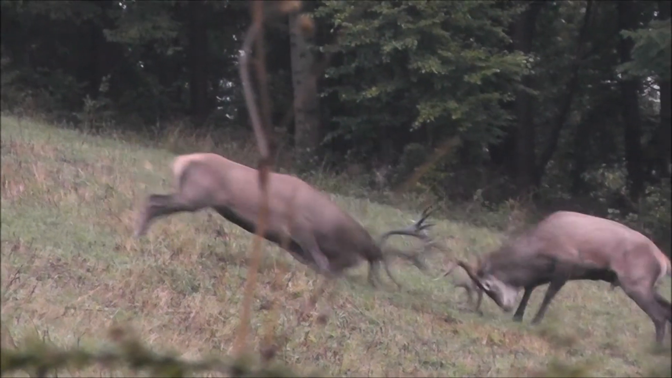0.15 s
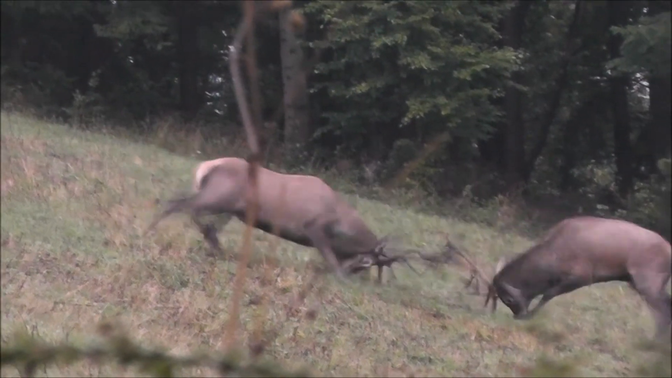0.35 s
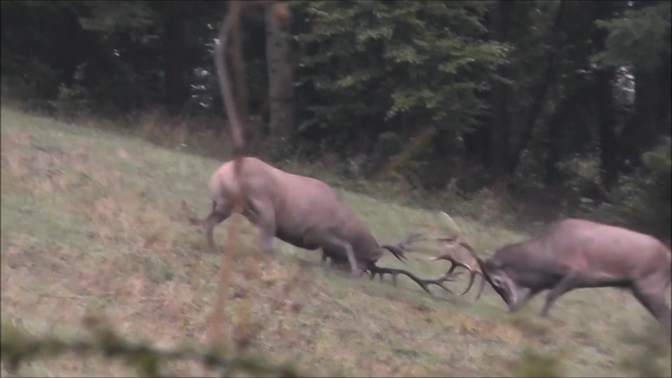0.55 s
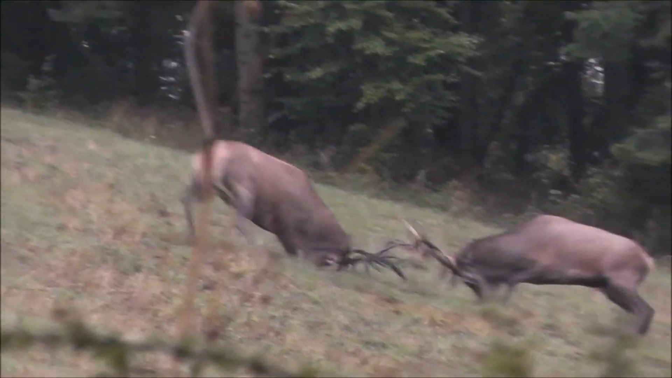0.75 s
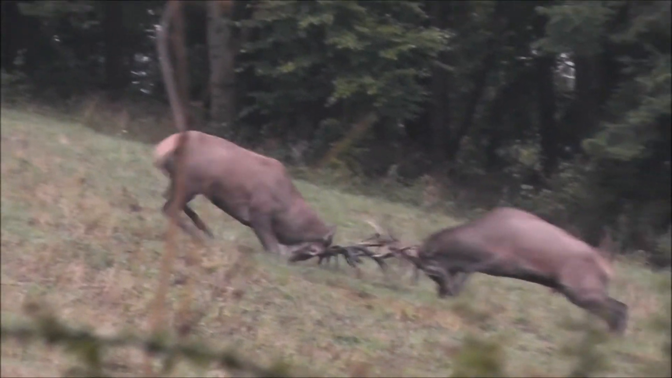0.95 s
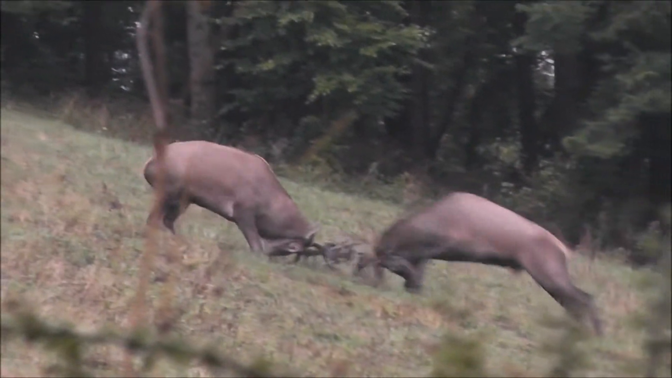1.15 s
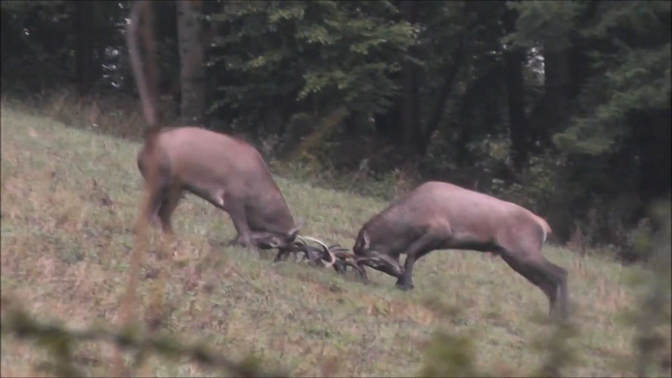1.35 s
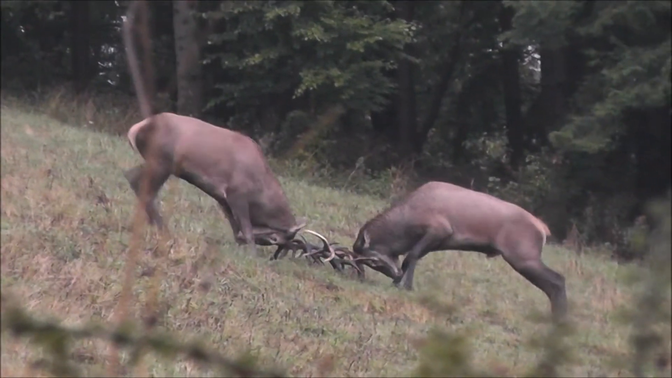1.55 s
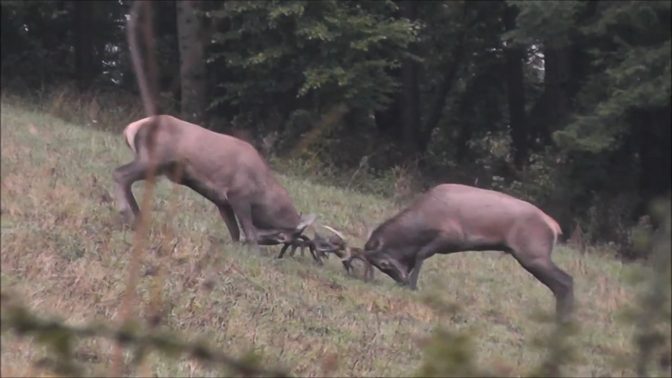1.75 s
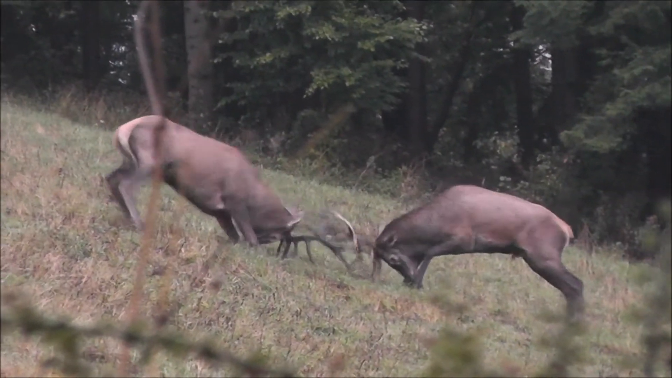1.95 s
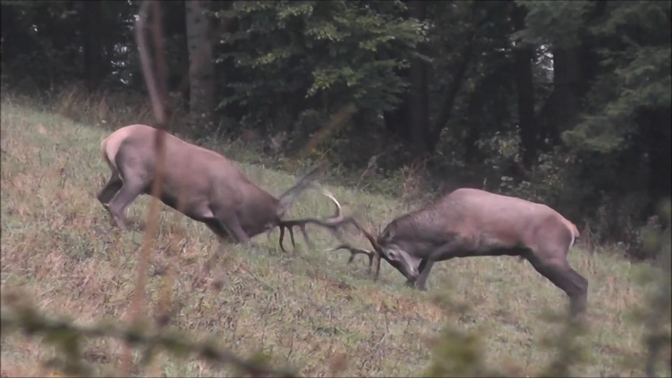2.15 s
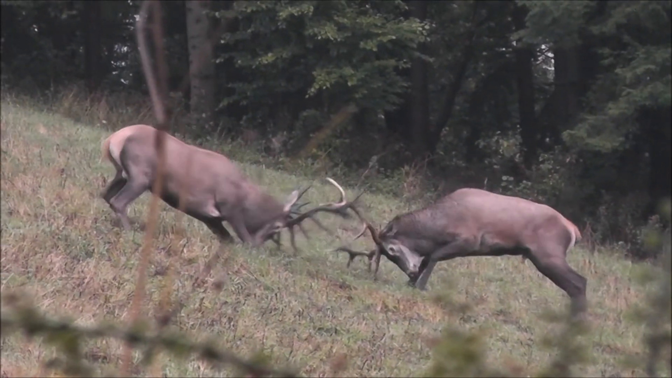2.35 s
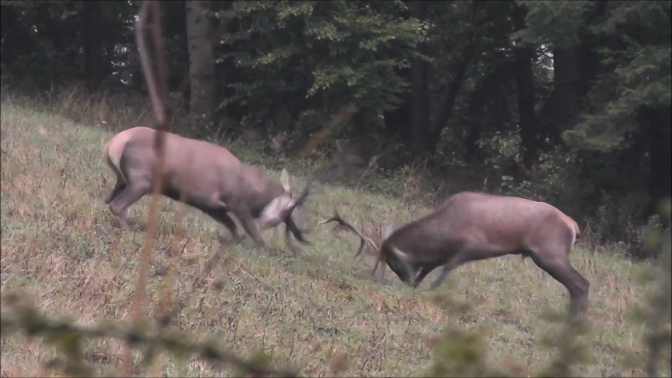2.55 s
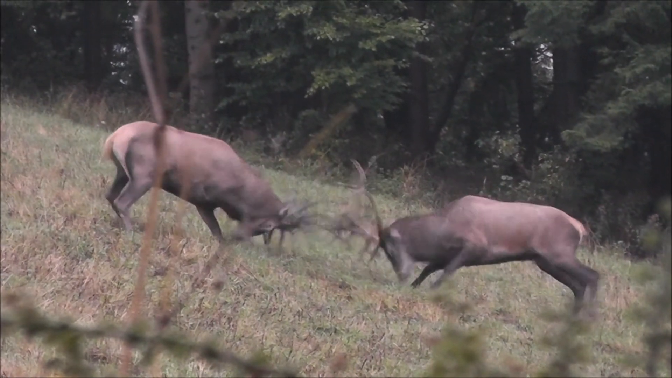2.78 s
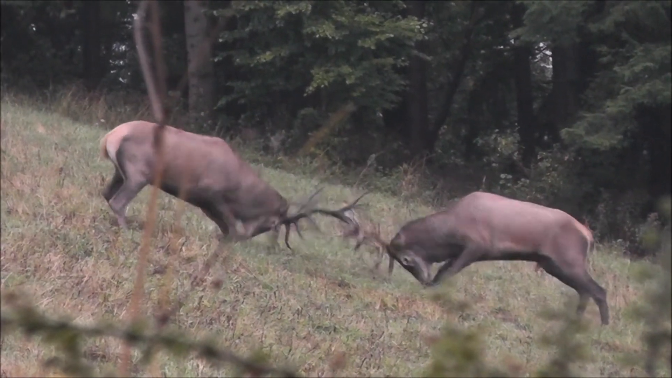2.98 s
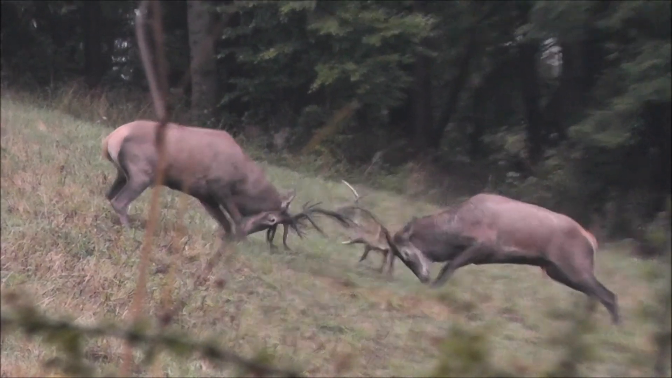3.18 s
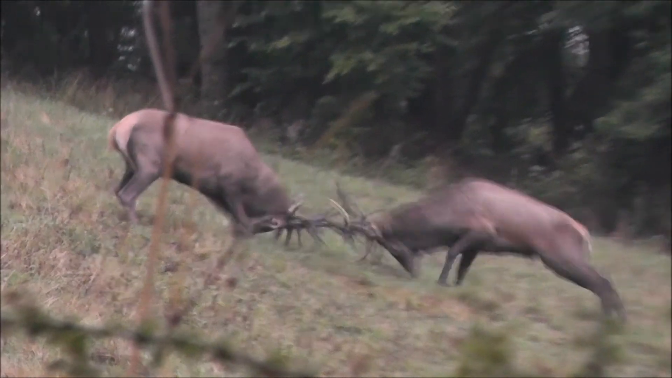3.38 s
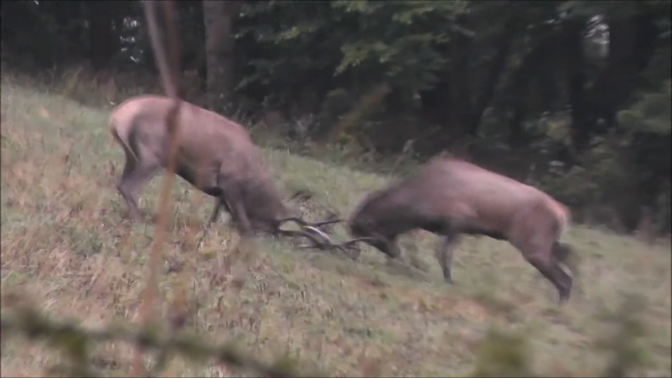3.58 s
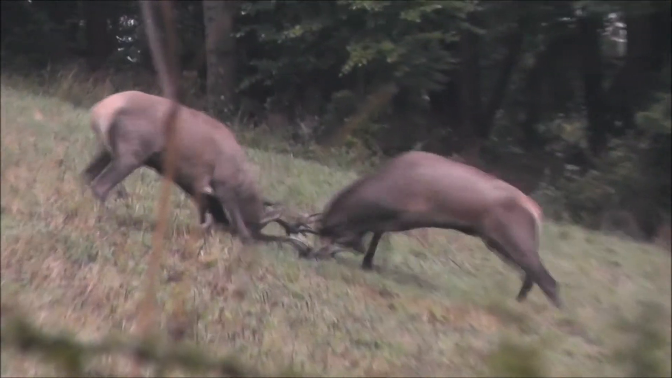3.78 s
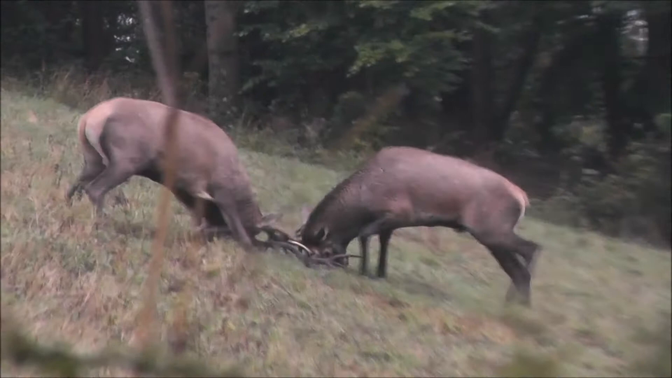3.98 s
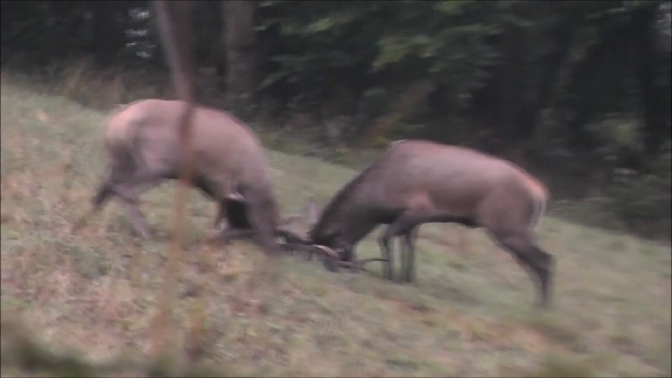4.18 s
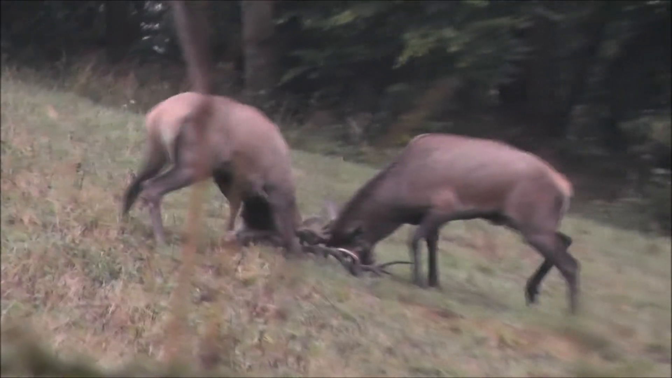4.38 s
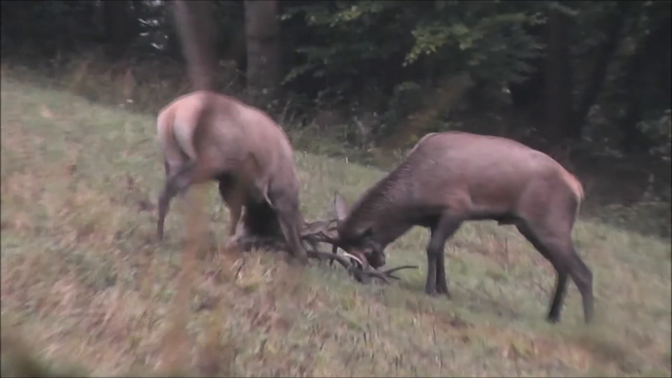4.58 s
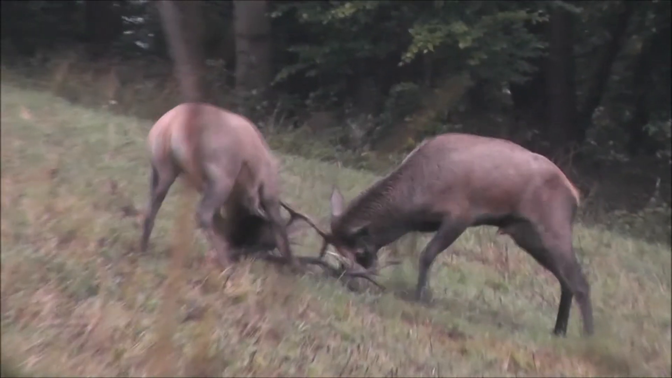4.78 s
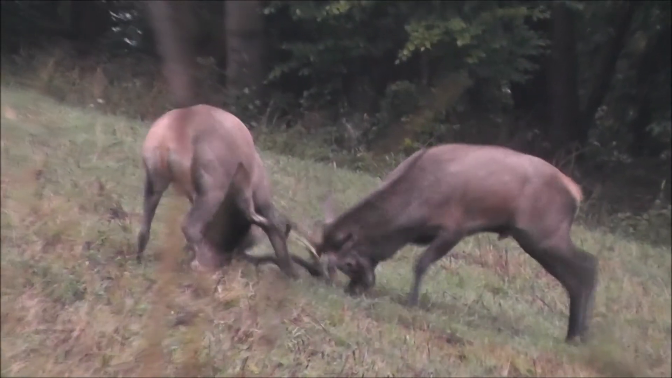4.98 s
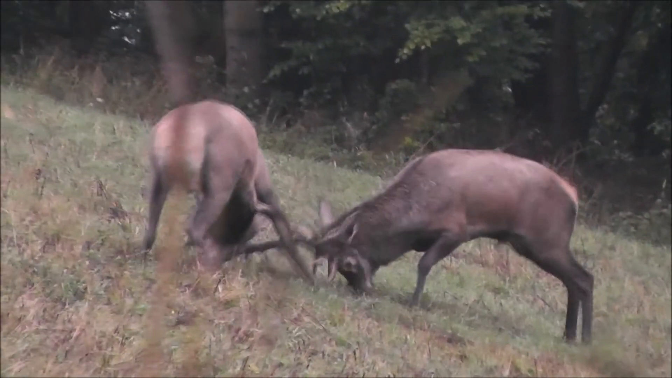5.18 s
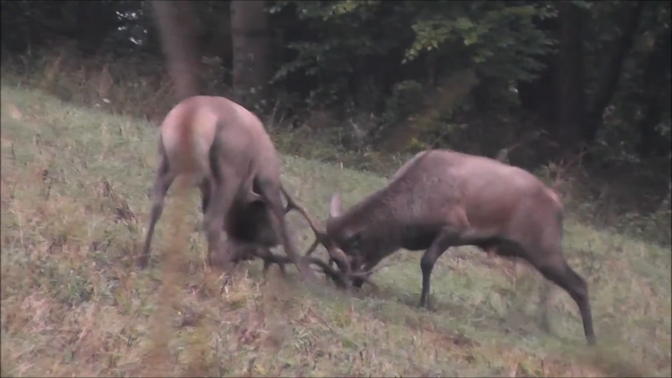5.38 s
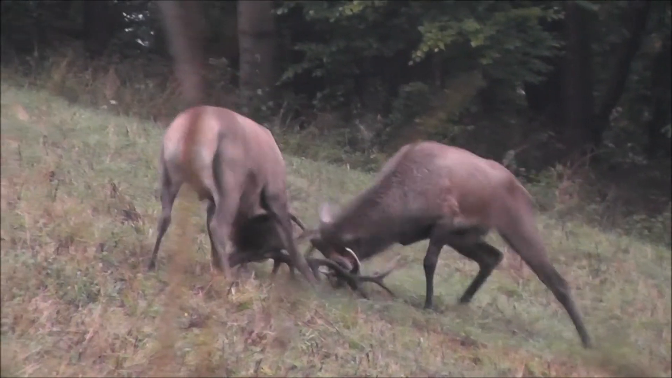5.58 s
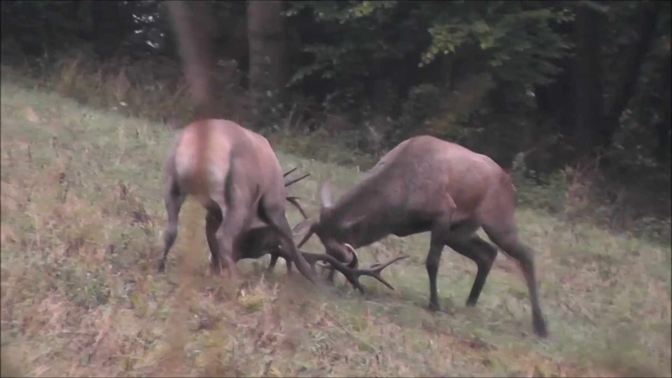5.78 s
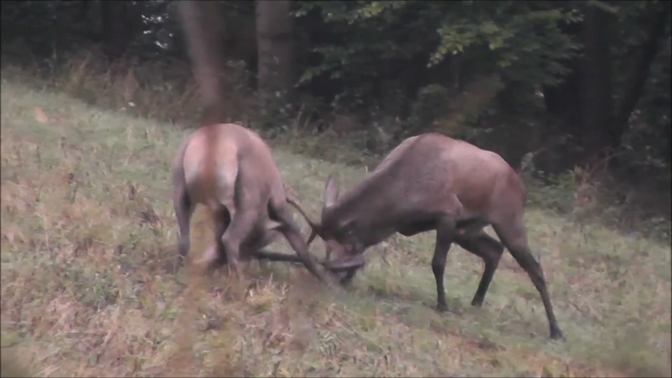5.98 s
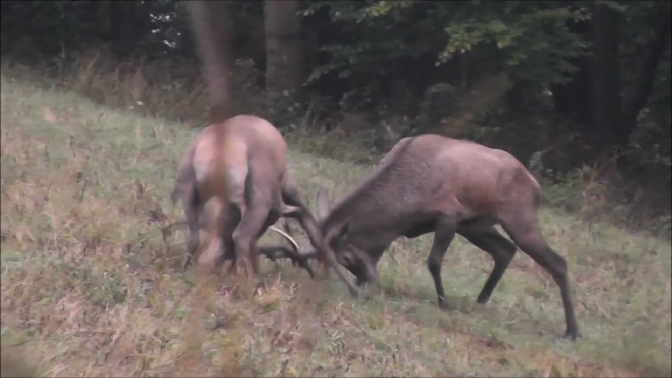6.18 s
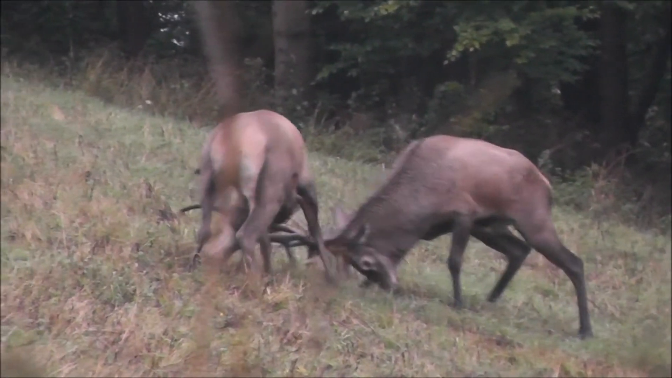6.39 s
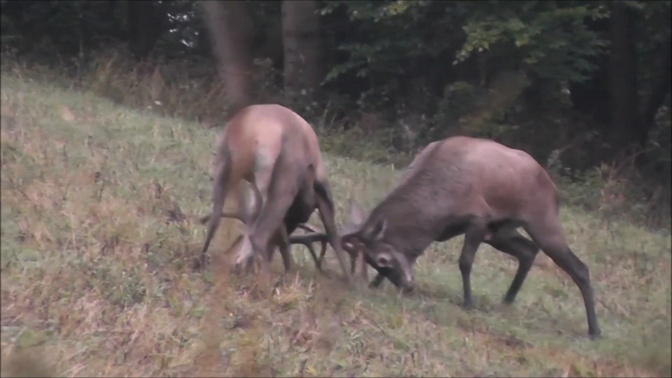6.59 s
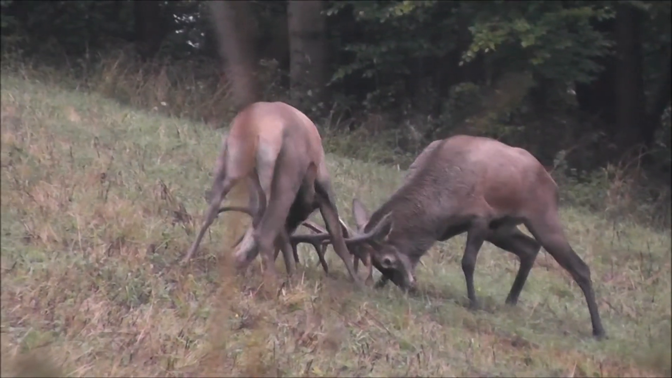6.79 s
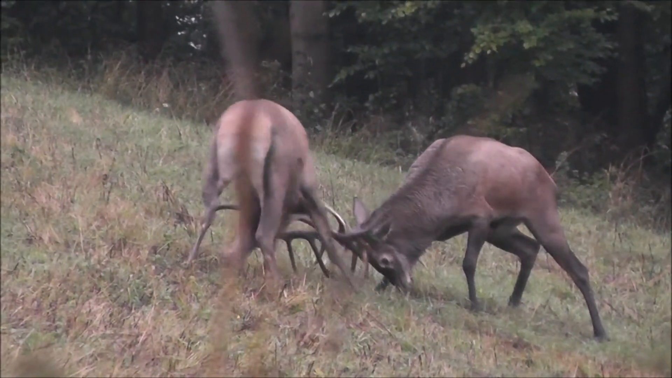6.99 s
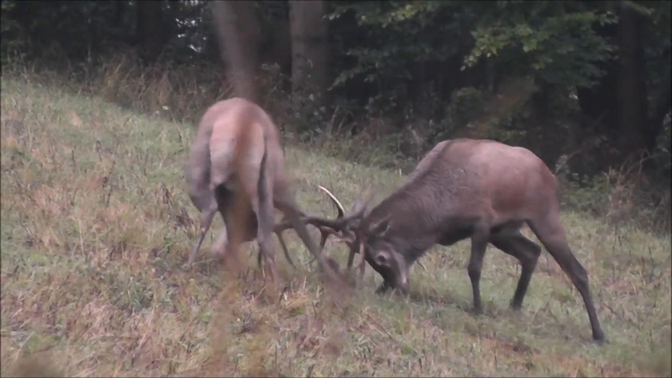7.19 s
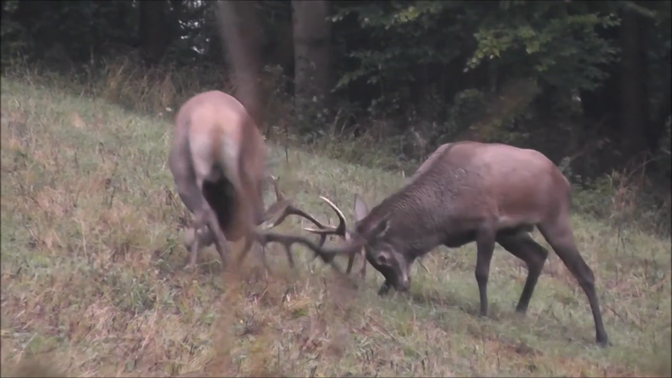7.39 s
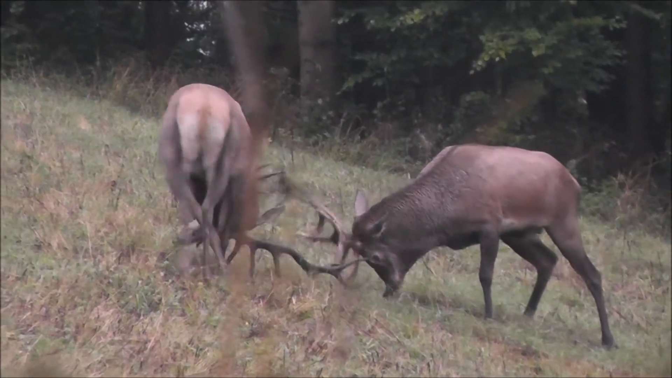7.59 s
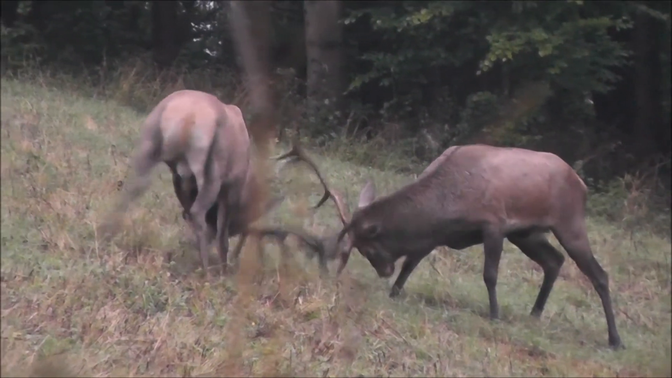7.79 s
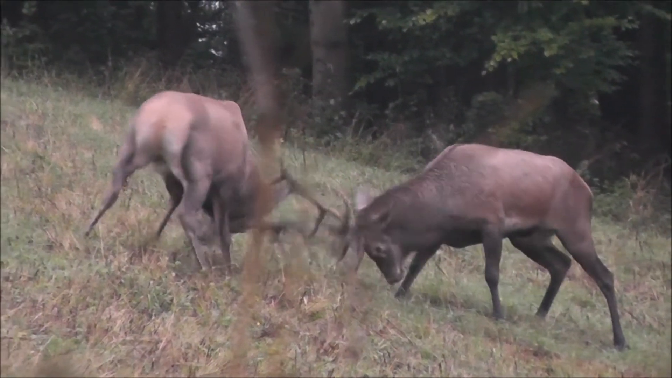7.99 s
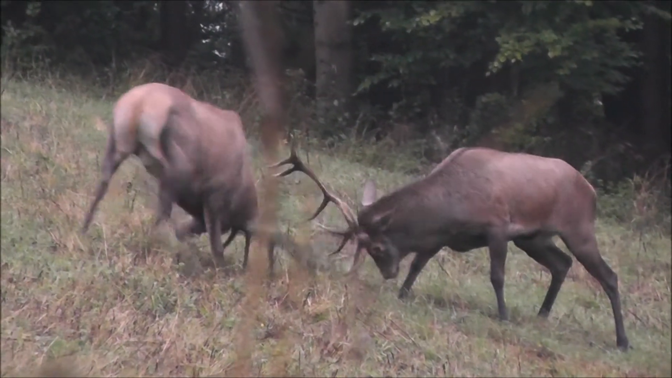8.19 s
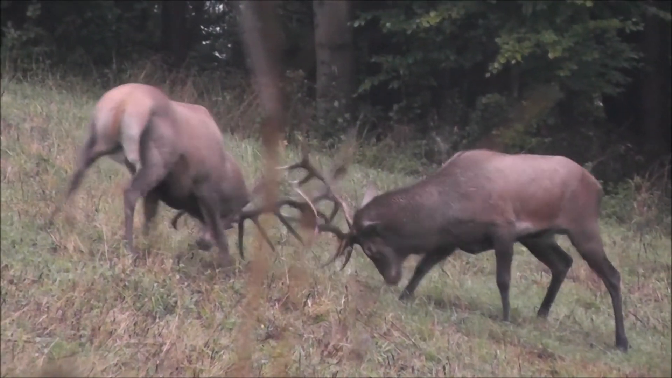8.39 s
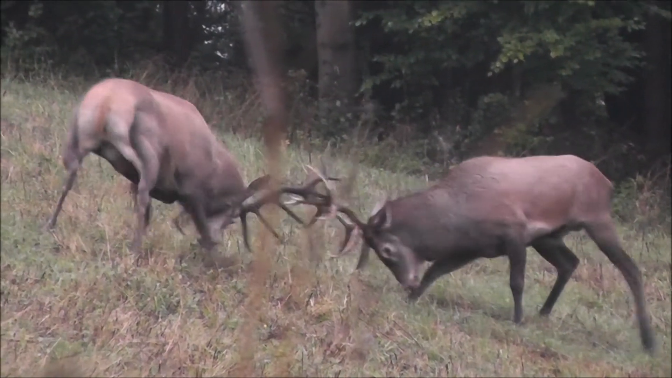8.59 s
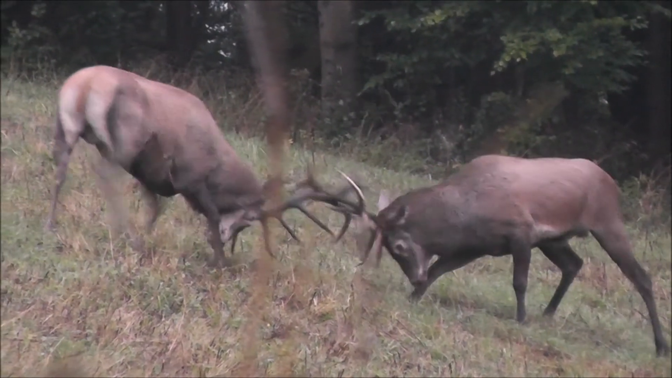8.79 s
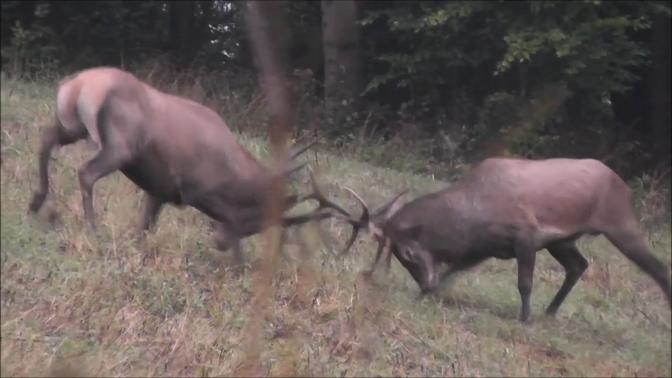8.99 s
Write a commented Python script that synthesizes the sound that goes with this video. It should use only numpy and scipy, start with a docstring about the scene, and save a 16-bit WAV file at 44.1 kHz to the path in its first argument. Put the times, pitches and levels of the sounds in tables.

```python
"""Two stags fight on a grassy slope at a forest edge, heard from a distance.
From the start: scuffed turf, rustling grass and light touches (noise puffs, bursts) over steady filtered noise.
Locked antlers knock (burst and mode), then free ones clack (damped modes, scrapes) and their tips crack.
Heavy shoves thud (low mode), hooves stamp (turf and grass bursts), stalks snap (sharp bursts) and
hooves drag (band noise). Noise tails give the echo of slope and trees to all timed blows but the drags."""
import sys
import numpy as np
from scipy import signal
from scipy.fft import rfft, irfft, next_fast_len
from scipy.io import wavfile
from scipy.ndimage import map_coordinates

SR = 44100
rng = np.random.default_rng(int(sys.argv[2]) if len(sys.argv) > 2 else 0)


def generate_wav(sig):
    """Save sig (samples, or channels by samples) to the path in sys.argv[1] as 16-bit PCM at SR."""
    pcm = np.round(np.clip(np.atleast_2d(sig).T, -1, 1) * 32767).astype(np.int16)
    wavfile.write(sys.argv[1], SR, pcm)


N = 399105

# Effort of the feet. Each row: time in seconds, scuffed turf in dB, dry grass in dB; only swings about the mean count.
TRAMPLE_CURVE = [(0.0, -36.5, -52), (0.7, -38.5, -50.5), (1.23, -41, -52.5), (1.43, -38, -50),
                 (1.66, -41, -52), (2.67, -43.5, -59.5), (2.9, -37.5, -50), (3.6, -38.5, -52),
                 (4.03, -41.5, -54.5), (4.54, -46, -50), (4.74, -41.5, -49), (5.01, -41, -51),
                 (5.27, -45, -51.5), (5.85, -44, -52), (6.35, -40.5, -51), (7.33, -45.5, -52),
                 (7.66, -40.5, -51.5), (7.99, -40, -51), (8.8, -41, -50), (9.05, -37.5, -52.5)]
# Locked antlers shift and knock, damped by the pressure on them. Each row: start in seconds, relative level in dB.
LOCKED_KNOCKS = [(.021, -22), (.865, -21), (1.088, -23), (1.226, -26.5), (1.439, -26), (2.144, -21),
                 (3.469, -22.5), (4.313, -22.5), (4.337, -27), (4.476, -21.5), (4.561, -29), (4.587, -19.5),
                 (5.038, -30), (5.161, -16), (6.045, -23), (6.294, -22), (6.364, -29.5), (6.723, -25),
                 (6.889, -21), (6.953, -25), (8.283, -24), (8.662, -19), (8.793, -23.5)]
# Antler on antler. Each row: start in seconds, relative level in dB, struck tine pitch in Hz, skid in seconds.
ANTLER_CLASHES = [(0.2164, -1, 1728, 0.00081), (0.3219, -18, 1590, 0.00084), (0.33, -12.5, 1650, 0.0016),
                  (0.345, -13, 1920, 0.0049), (0.4394, -15, 1920, 0.0028), (0.4504, -9.5, 1476, .003),
                  (0.4652, -8.5, 1720, .009), (0.478, -4.5, 1510, 0.0058), (0.4861, -7.5, 2950, 0.008),
                  (.5328, -16, 1410, .003), (0.5366, -3, 1590, 0.0065), (.54, -4.5, 2680, 0.0048),
                  (0.7828, -15, 1130, 0.0066), (0.9226, -10.5, 2160, 0.0058), (1.377, -17, 1970, 0.0037),
                  (2.184, -16, 1620, 0.0076), (2.1895, -12, 1730, 0.0013), (2.221, -17.5, 1730, 0.0022),
                  (2.639, -11, 1350, 0.009), (2.828, -18.5, 1650, 0.00078), (2.8697, -1, 1610, 0.00063),
                  (2.9474, -10.5, 2350, 0.011), (3.0155, -10, 1630, 0.004), (3.034, 0, 2030, 0.0054),
                  (3.061, -8.5, 1600, 0.0095), (3.26, -5, 1980, 0.0024), (3.343, -12, 3040, 0.0018),
                  (3.345, -17, 1720, 0.0075), (3.364, -16, 1830, 0.0072), (3.8, -18, 1940, 0.0047),
                  (5.069, -18.5, 1980, .004), (5.561, -26.5, 2630, .003), (5.685, -22.5, 1550, .008),
                  (5.717, -15.5, 1360, 0.0038), (6.191, -23.5, 1310, 0.0098), (6.5, -26, 2730, 0.00053),
                  (7.558, -19.5, 1910, 0.0011), (7.683, -17.5, 1420, .001), (7.8403, -16.5, 1940, 0.0054),
                  (7.9352, -18, 2780, 0.0038), (7.948, -16.5, 1720, .012), (7.964, -10.5, 1740, 0.0038),
                  (8.048, -12, 1610, 0.0019), (8.0484, -22, 3020, .002), (8.1047, -16, 1940, .006),
                  (8.445, -22, 1880, 0.0048), (8.551, -17, 1620, 0.011), (8.571, -12, 1460, 0.021),
                  (8.578, -5.5, 1970, 0.0036), (8.604, -9.5, 2600, 0.0041), (8.616, -11, 1600, 0.016)]
# Hard tips that catch and crack. Each row: start in seconds, peak before echo in dB.
TIP_CRACKS = [(0.2179, -10.5), (.4784, -3), (0.4887, -9), (0.5362, -7.5), (.7838, -13.5), (3.016, -17.5),
              (3.0343, -12), (6.501, -16)]
# Weight of bodies meeting the ground. Each row: start in seconds, relative level in dB.
BODY_THUDS = [(0.49, -36.5), (0.541, -42), (0.754, -46.5), (2.875, -42.5), (3.584, -43.5)]
# Heavier hoof falls. Each row: start in seconds, relative level in dB.
HOOF_STAMPS = [(0.887, -25), (1.15, -25.5), (1.527, -20), (2.273, -22), (2.434, -20), (2.609, -25),
               (3.299, -19), (3.779, -18.5), (3.884, -27), (4.102, -21), (4.249, -23.5), (4.279, -18.5),
               (4.508, -24.5), (4.637, -17.5), (4.688, -21), (4.811, -19.5), (4.846, -26.5), (4.902, -21.5),
               (5.113, -16.5), (5.589, -21), (5.658, -22), (6.023, -17.5), (6.5, -19), (6.705, -24),
               (8.2985, -15.5), (9.028, -15)]
# Dry stalks breaking. Each row: start in seconds, peak before echo in dB.
STALK_SNAPS = [(1.087, -25), (1.988, -17), (2.247, -18.5), (3.173, -17.5), (3.742, -17.5), (3.845, -17),
               (4.006, -24.5), (6.01, -26), (6.024, -18.5), (6.481, -29), (7.097, -27), (7.131, -30),
               (7.718, -23.5), (8.421, -22)]
# A hoof ploughs the turf. Each row: centre in seconds, half length in seconds, level in dB, centre frequency in Hz.
HOOF_DRAGS = [(1.274, 0.01, -31, 1240), (2.247, 0.037, -34.5, 704), (4.16, 0.011, -35, 850),
              (5.982, 0.059, -42, 425), (8.769, 0.026, -35, 1070), (8.877, 0.028, -32.5, 1120)]
# Nominal modes of an antler rack. Each row: frequency in Hz, relative level in dB, t60 in seconds.
RACK_MODES = [(1355, -13.5, 0.041), (1673, -5, 0.011), (1880, 1.5, 0.013), (2510, 8, 0.0053),
              (2820, -3.5, 0.0072), (3150, -11.5, 0.014), (3873, -13.5, 0.013)]

# Spectrum of scuffed or struck turf. Each row: frequency in Hz, relative density in dB.
TURF_SPECTRUM = [(70, -43.5), (280, 0.5), (550, 8), (1400, 4.5), (3300, -5.5), (9000, -39)]
# Spectrum of dry grass, also of the hiss. Each row: frequency in Hz, relative density in dB.
GRASS_SPECTRUM = [(1500, -19), (3300, -0.5), (5500, -1.5), (7800, 2.5), (9500, -14.5), (16000, -23)]
# Spectrum of open air. Each row: frequency in Hz, relative density in dB.
AIR_SPECTRUM = [(25, -87), (85, -26), (300, -5), (520, -2.5), (1800, -3), (5000, -19.5), (16000, -30)]
# Spectrum of bone scraping bone. Each row: frequency in Hz, relative density in dB.
BONE_SPECTRUM = [(90, -78), (900, 1), (1400, 5.5), (3000, 2.5), (4100, -9.5), (6000, -33.5)]
# Spectrum of a hard crack. Each row: frequency in Hz, relative density in dB.
CRACK_SPECTRUM = [(250, -59), (3000, 11.5), (5600, 10), (8600, 7.5), (16000, -82)]
# Spectrum of a breaking stalk. Each row: frequency in Hz, relative density in dB.
STALK_SPECTRUM = [(200, -12), (5000, 11.5), (7800, 23.5), (16000, -12)]
# Filter of the side channel. Each row: frequency in Hz, gain in dB.
SIDE_GAIN = [(60, 10.5), (250, -9.5), (1300, -16.5), (2400, -41.5), (7000, -29.5), (13000, -15)]
# Hollows in the heard response. Each row: frequency in Hz, width in Hz, gain at centre in dB.
RESPONSE_NOTCHES = [(996, 98, -12), (2213, 470, -8), (4490, 560, -9.5), (13340, 1600, -12)]

TOP_HZ = 15850
LEAD_SAMPLES = SR // 40  # sliding contact ahead of each blow
CATCH_DB = 16.5  # jolt as two surfaces catch, over the crackle
SCUFF_DB, SCUFF_DB_PER_DB = -43, 1.16  # usual level; swing with the trampling
GRASS_DB, GRASS_DB_PER_DB = -54, 3.36
TOUCHES_PER_S, TOUCH_DB = 14, -8  # level is relative to the scuffing
BEAM_HZ, BEAM_OCTAVES = 1860, 0.099  # main beam resonance and its reach
TINE_DB = 3.5  # struck tine over the rack
BEAM_DB, BEAM_DB_PER_DB = 19, 0.39  # tine gain in tune with the beam; growth with blow level
FOCUS_DB_PER_OCTAVE = 6.5  # loss of rack modes away from the struck tine
SLIDE_S = 0.013  # a skid this long halves the tine's own note
CRUNCH_DB, CRUNCH_DB_PER_DB = -9.5, 0.62  # crushed stems, offset from the stamp level; growth with stirred grass
LEFT_SHARE = 0.027  # antlers meet just left of centre


def amp(db):
    """Decibels to gain."""
    return 10 ** (np.asarray(db) / 20)


def unit(x):
    """x at rms 1."""
    return x / np.sqrt(np.mean(x ** 2) + 1e-20)


def peaked(x):
    """x at peak 1."""
    return x / np.abs(x).max()


def along(points, hz):
    """(Hz, value) points interpolated on a log frequency axis."""
    f, values = np.transpose(points)
    return np.interp(np.log(hz + 1), np.log(f), values)


def coloured(x, spectrum):
    """x through a minimum-phase filter, found by folding the cepstrum of the (Hz, dB) points."""
    size = 2048
    gain = amp(along(spectrum, np.fft.rfftfreq(size, 1 / SR)))
    cepstrum = irfft(np.log(gain))
    cepstrum[1:size // 2] *= 2
    cepstrum[size // 2 + 1:] = 0
    response = irfft(np.exp(rfft(cepstrum)))
    return signal.fftconvolve(x, response)[:len(x)]


def wobble(knots_per_s):
    """A smooth random curve through normally distributed knots."""
    knots = rng.standard_normal(int(N * knots_per_s / SR) + 4)
    return map_coordinates(knots, [np.arange(N) * knots_per_s / SR])


def fade(t60_s):
    """Exponential decay lasting half a second."""
    return np.exp(-np.log(1000) * np.arange(SR // 2) / SR / t60_s)


def ring(hz, t60_s):
    """One damped mode that starts when the surfaces catch; contact softens about its first cycle."""
    cycles = hz * np.arange(SR // 8) / SR
    onset = 1 - np.exp(-(cycles / 1.56) ** 2)
    mode = np.sin(2 * np.pi * cycles) * fade(t60_s)[:len(cycles)] * onset
    return np.pad(mode, (LEAD_SAMPLES, SR // 2 - LEAD_SAMPLES - len(mode)))


def grains(size, spread_db):
    """Noise of tiny impulses of very unequal strength, rms 1."""
    strength = amp(spread_db * rng.standard_normal(size))
    return unit(rng.standard_normal(size) * strength)


def burst(spectrum, t60_s, lead_db=-30, lead_t60_s=0.0045):
    """Crackle of peak 1: surfaces slide for a moment, catch with a jolt, and the noise dies away."""
    slide = amp(lead_db) * fade(lead_t60_s)[:LEAD_SAMPLES][::-1]
    shape = np.concatenate([slide, fade(t60_s)])[:SR // 2]
    jolt = amp(CATCH_DB) * (np.arange(SR // 2) == LEAD_SAMPLES)
    crackle = grains(SR // 2, spread_db=2.5) * shape
    return peaked(coloured(jolt + crackle, spectrum))


def outdoors(blow, near_db, forest_db, forest_t60_s, near_t60_s=0.093):
    """A blow, its scatter off the nearby slope and its longer answer from the trunks, both as noise tails."""
    near = grains(SR // 2, spread_db=5) * (fade(near_t60_s) - fade(near_t60_s / 5))
    forest = rng.standard_normal(SR // 2) * (fade(forest_t60_s) - fade(near_t60_s))
    near_path = amp(near_db) * near / np.linalg.norm(near)
    forest_path = amp(forest_db) * forest / np.linalg.norm(forest)
    return blow + signal.fftconvolve(blow, near_path + forest_path)[:len(blow)]


def add(track, start_s, sound):
    """Mix a sound into the track so that its blow falls at start_s."""
    start = round(start_s * SR) - LEAD_SAMPLES
    sound = sound[max(-start, 0):]
    room = track[max(start, 0):][:len(sound)]
    room += sound[:len(room)]


def trampling(at_s):
    """Swings of scuffing and stirred grass about their mean levels, in dB."""
    time_s, *levels_db = np.transpose(TRAMPLE_CURVE)
    return [np.interp(at_s, time_s, level_db - level_db.mean()) for level_db in levels_db]


def patter(hits_per_s, spread_db, t60_s):
    """Small contacts at random moments, each a brief puff of noise; rms 1."""
    strength = amp(spread_db * rng.uniform(-0.7, 1, N))
    power = (rng.random(N) < hits_per_s / SR) * strength ** 2
    envelope = np.sqrt(np.abs(signal.fftconvolve(power, fade(t60_s / 2))[:N]))
    return unit(envelope * rng.standard_normal(N))


def light_touches():
    """Hooves, tines and twigs touch lightly at random moments: one short mixed burst, repeated; rms 1."""
    hits = (rng.random(N) < TOUCHES_PER_S / SR) * rng.uniform(.3, 1, N)
    touch = burst(TURF_SPECTRUM, t60_s=.013)
    touch = touch + amp(-4) * burst(BONE_SPECTRUM, t60_s=.011)
    touch = touch + amp(-4) * burst(GRASS_SPECTRUM, t60_s=.008)
    return unit(signal.fftconvolve(hits, touch)[:N])


def trampled_ground():
    """Feet scuff the turf and stir dry grass: patter of puffs under one shared random effort."""
    scuff_swing_db, grass_swing_db = trampling(np.arange(N) / SR)
    scuff_db = SCUFF_DB + SCUFF_DB_PER_DB * scuff_swing_db
    grass_db = GRASS_DB + GRASS_DB_PER_DB * grass_swing_db
    effort_db = 1.6 * wobble(knots_per_s=9.7)
    clods = patter(hits_per_s=170, spread_db=6.5, t60_s=.022)
    scuff = amp(scuff_db + effort_db) * unit(coloured(clods, TURF_SPECTRUM))
    stems = patter(hits_per_s=300, spread_db=9, t60_s=.011)
    grass = amp(grass_db + .5 * effort_db) * unit(coloured(stems, GRASS_SPECTRUM))
    return scuff + grass + amp(scuff_db + TOUCH_DB) * light_touches()


def open_air():
    """The steady rush of the open air: two layers of filtered noise."""
    hiss = amp(-54.5) * unit(coloured(rng.standard_normal(N), GRASS_SPECTRUM))
    air = amp(-43.5) * unit(coloured(rng.standard_normal(N), AIR_SPECTRUM))
    return hiss + air


def slope():
    """Trampled ground over open air, drawn afresh at each call."""
    return trampled_ground() + open_air()


def locked_antlers():
    """Beams pressed together slip and catch: a dull burst with one short mode."""
    track = np.zeros(N)
    for start_s, db in LOCKED_KNOCKS:
        beam = ring(1300 * rng.lognormal(0, 0.14), t60_s=0.014)
        knock = peaked(burst(TURF_SPECTRUM, t60_s=0.018) + amp(3.5) * beam)
        add(track, start_s, outdoors(amp(db + 2.5) * knock, near_db=-3, forest_db=-7.5, forest_t60_s=0.34))
    return track


def chatter(skid_s):
    """Contact force: one impulse, then uneven ones while the tines skid over each other's ridges."""
    t = np.arange(-2 * LEAD_SAMPLES, 2 * LEAD_SAMPLES + 1) / SR
    ridges = (rng.random(len(t)) < 2000 / SR) * rng.normal(0, .6, len(t))
    return (t == 0) + ridges * (t > 0) * np.exp(-(t / skid_s) ** 4)


def rack_ring(tine_hz):
    """The whole rack's damped modes; each contact point shares the blow differently among them."""
    shares = amp(rng.normal(0, 2.5, len(RACK_MODES))) * rng.choice([-1, 1], len(RACK_MODES))
    total = 0
    for share, (hz, level_db, t60_s) in zip(shares, RACK_MODES):
        loss_db = FOCUS_DB_PER_OCTAVE * abs(np.log2(hz / tine_hz))
        total = total + share * amp(level_db - loss_db) * ring(hz * rng.normal(1, 0.048), t60_s)
    return total


def tine_ring(tine_hz, db, skid_s):
    """The struck tine's mode: a hard blow in tune with the beam concentrates it, a long skid weakens it."""
    in_tune = np.exp(-(np.log2(tine_hz / BEAM_HZ) / BEAM_OCTAVES) ** 2)
    gain_db = TINE_DB + in_tune * (BEAM_DB + BEAM_DB_PER_DB * db)
    return amp(gain_db) * ring(tine_hz, t60_s=0.011) / (1 + skid_s / SLIDE_S)


def clashing_antlers():
    """Each contact's force scrapes bone on bone and rings the struck tine and the rack."""
    track = np.zeros(N)
    for start_s, db, tine_hz, skid_s in ANTLER_CLASHES:
        skid_s = max(skid_s, 1 / SR)
        modes = rack_ring(tine_hz) + tine_ring(tine_hz, db, skid_s)
        force = chatter(skid_s)
        clack = amp(db + 1.3) * peaked(signal.fftconvolve(modes, force, "same"))
        grit = burst(BONE_SPECTRUM, t60_s=0.013) + amp(-12) * burst(CRACK_SPECTRUM, t60_s=0.011)
        scrape = amp(db - 8.0) * peaked(signal.fftconvolve(grit, force, "same"))
        add(track, start_s, outdoors(clack, near_db=-8, forest_db=-15, forest_t60_s=.7))
        add(track, start_s, outdoors(scrape, near_db=-1.5, forest_db=-3.5, forest_t60_s=1.0))
    return track


def antler_tips():
    """Hard tips catch with a brief bright crack."""
    track = np.zeros(N)
    for start_s, db in TIP_CRACKS:
        crack = amp(db) * burst(CRACK_SPECTRUM, t60_s=0.0065)
        add(track, start_s, outdoors(crack, near_db=-1.0, forest_db=-5.5, forest_t60_s=0.27))
    return track


def shoves():
    """Heavy bodies brace against soft ground: one low, short mode."""
    track = np.zeros(N)
    for start_s, db in BODY_THUDS:
        thud = peaked(ring(178 * rng.normal(1, .1), t60_s=.035))
        add(track, start_s, outdoors(amp(db + 3.0) * thud, near_db=-3.5, forest_db=-1.5, forest_t60_s=0.77))
    return track


def hooves():
    """A hoof brushes through dry grass, knocks dead on the turf and crushes the stems under it."""
    track = np.zeros(N)
    for start_s, db in HOOF_STAMPS:
        crunch_db = db + CRUNCH_DB + CRUNCH_DB_PER_DB * trampling(start_s)[1]
        sod = ring(640 * rng.lognormal(0, 0.081), t60_s=0.017)
        turf = burst(TURF_SPECTRUM, t60_s=.018, lead_db=-26, lead_t60_s=.08)
        knock = peaked(turf + amp(-2) * sod)
        crunch = burst(GRASS_SPECTRUM, t60_s=0.04, lead_db=-12.0, lead_t60_s=0.089)
        step = amp(db + 3.0) * knock + amp(crunch_db) * crunch
        add(track, start_s, outdoors(step, near_db=-6, forest_db=-7, forest_t60_s=0.53))
    return track


def stalks():
    """Brittle stalks break with a thin, sharp tick."""
    track = np.zeros(N)
    for start_s, db in STALK_SNAPS:
        tick = amp(db) * burst(STALK_SPECTRUM, t60_s=0.0065, lead_db=-10, lead_t60_s=0.0094)
        add(track, start_s, outdoors(tick, near_db=-4.5, forest_db=-15, forest_t60_s=0.17))
    return track


def drags():
    """A sliding hoof ploughs the turf: two octaves of noise that swell and fade."""
    t = np.arange(N) / SR
    track = np.zeros(N)
    for centre_s, half_s, db, hz in HOOF_DRAGS:
        soil = signal.butter(2, [hz / 2, hz * 2], "band", fs=SR, output="sos")
        scrape = unit(signal.sosfilt(soil, rng.standard_normal(N)))
        track += amp(db) * np.exp(-((t - centre_s) / half_s) ** 2) * scrape
    return track


def scene():
    """The fight lies almost straight ahead; mainly rustle and scattered echoes differ between the ears."""
    clashes = clashing_antlers() + antler_tips()
    blows = locked_antlers() + clashes + shoves() + hooves() + stalks() + drags()
    scatter = rng.standard_normal(SR // 2) * fade(t60_s=0.28)
    echoes = signal.fftconvolve(blows, scatter / np.linalg.norm(scatter))[:N]
    mid = blows + slope()
    side = coloured(slope() + amp(-4.0) * echoes, SIDE_GAIN) + LEFT_SHARE * clashes
    return np.array([mid + side, mid - side])


def record(dry):
    """Narrow hollows colour the sound; peaks clip at full scale, then the band is limited."""
    size = next_fast_len(N + SR // 2)
    f = np.fft.rfftfreq(size, 1 / SR)
    response = 1
    for hz, width_hz, db in RESPONSE_NOTCHES:
        damping = 1j * f * width_hz
        response = response * (1 - (1 - amp(db)) * damping / (hz ** 2 - f ** 2 + damping))
    heard = irfft(rfft(dry, size) * response, size)
    clipped = np.clip(heard, -1, 1)
    return irfft(rfft(clipped) * (f < TOP_HZ), size)[:, :N]


dry = scene()
out = record(dry)
generate_wav(out)
```